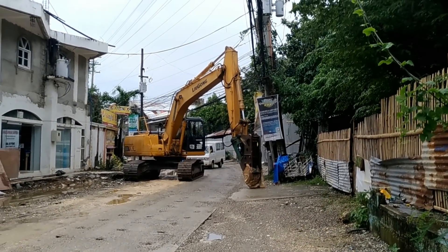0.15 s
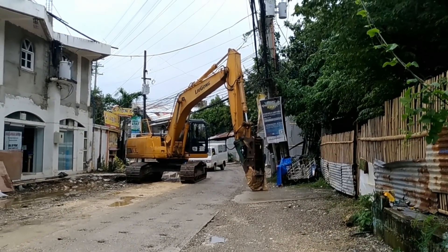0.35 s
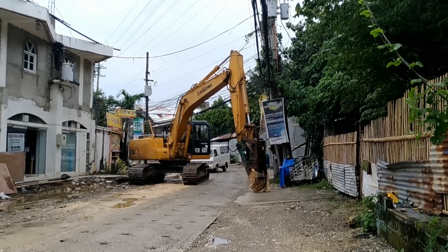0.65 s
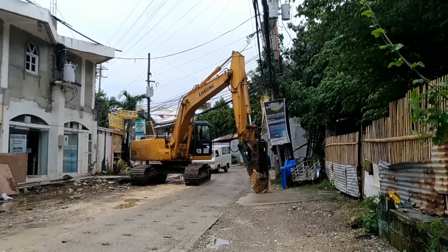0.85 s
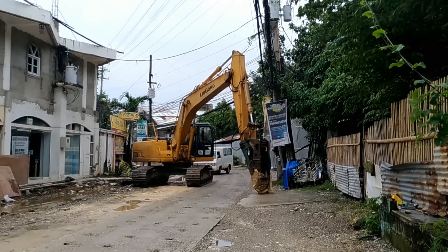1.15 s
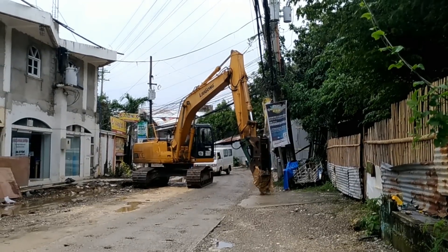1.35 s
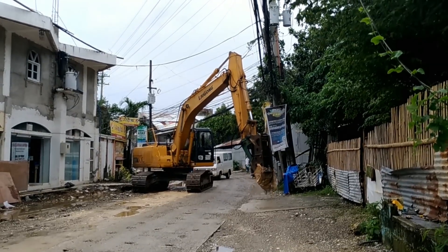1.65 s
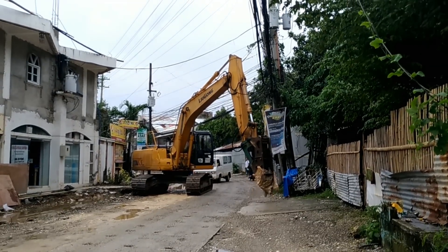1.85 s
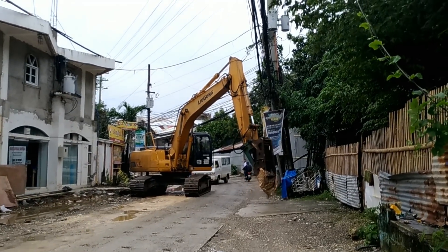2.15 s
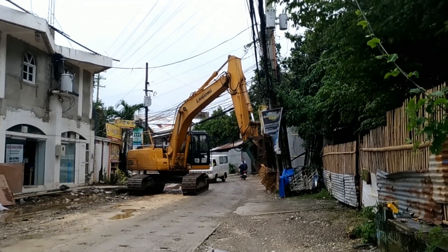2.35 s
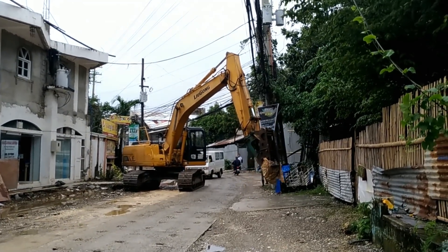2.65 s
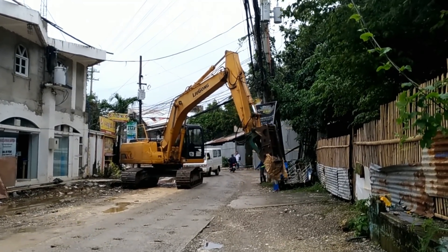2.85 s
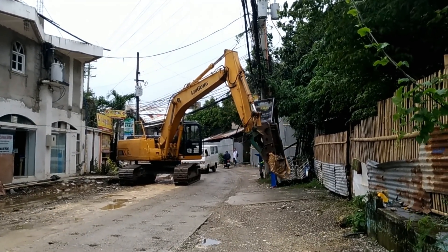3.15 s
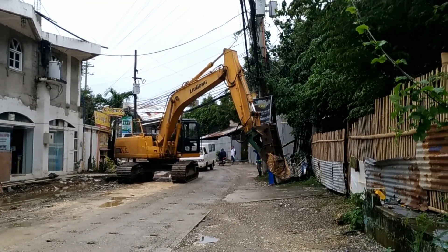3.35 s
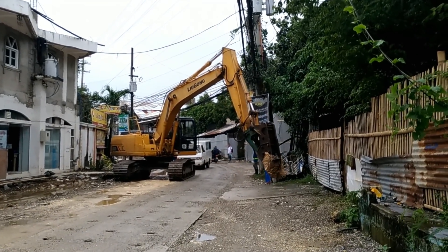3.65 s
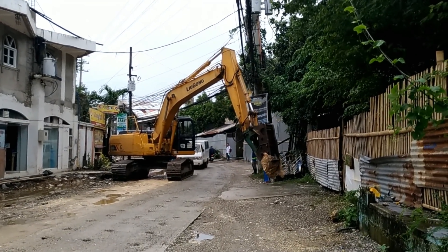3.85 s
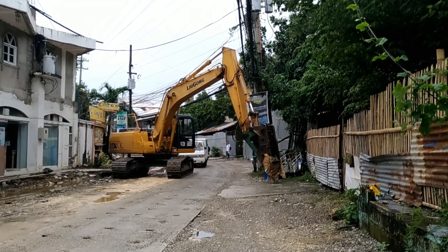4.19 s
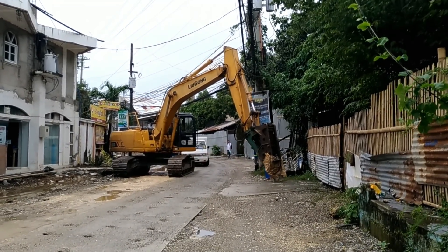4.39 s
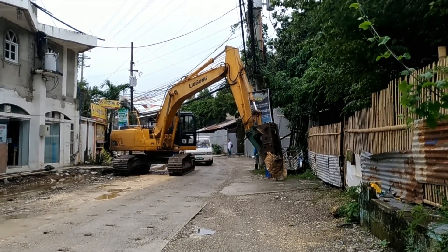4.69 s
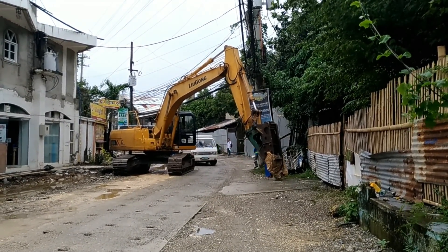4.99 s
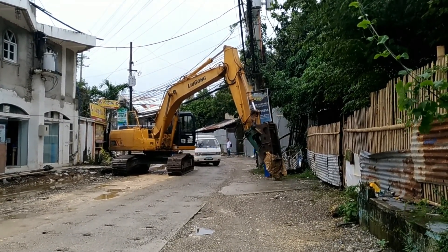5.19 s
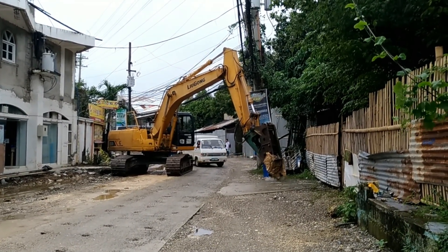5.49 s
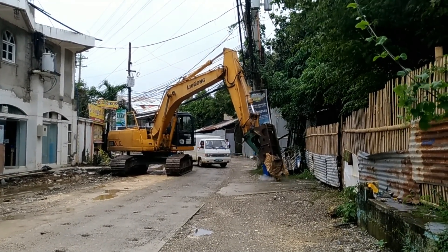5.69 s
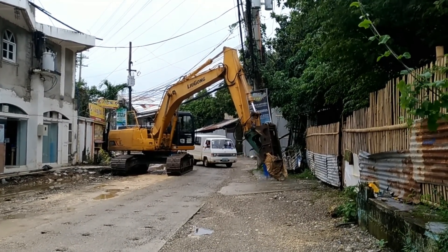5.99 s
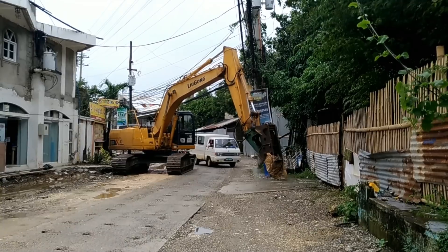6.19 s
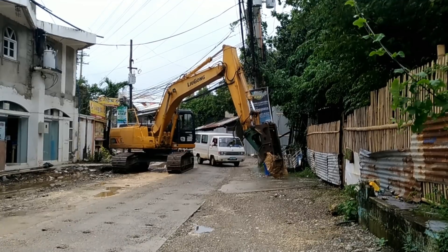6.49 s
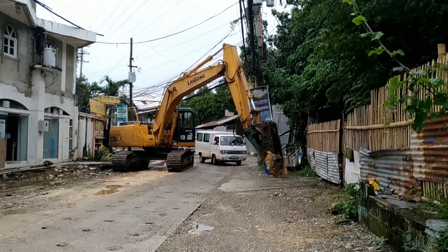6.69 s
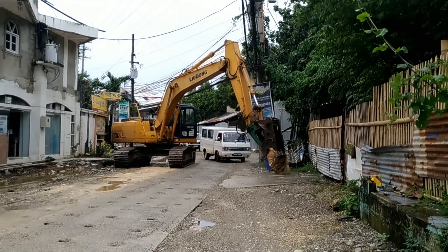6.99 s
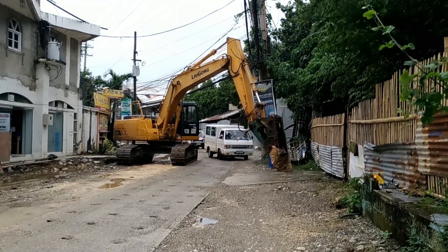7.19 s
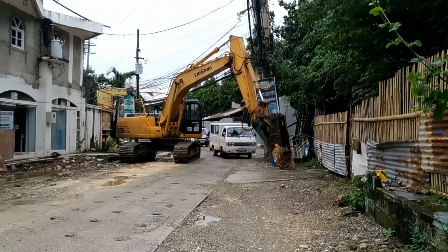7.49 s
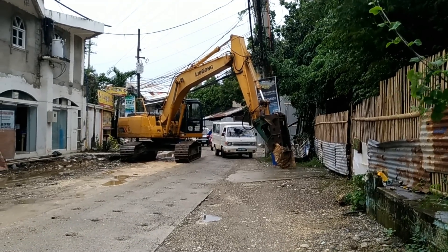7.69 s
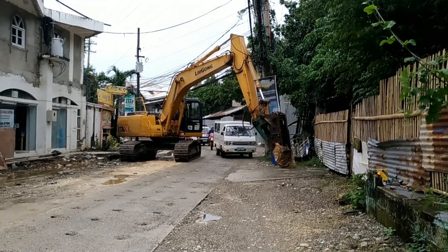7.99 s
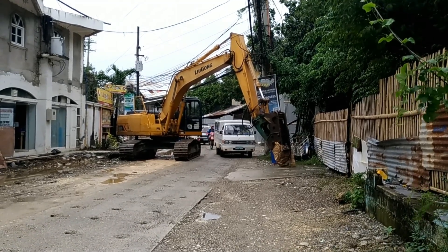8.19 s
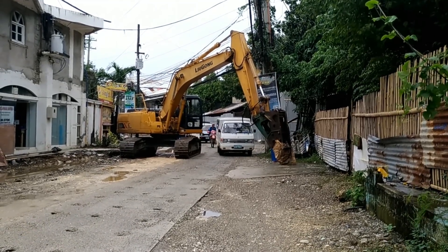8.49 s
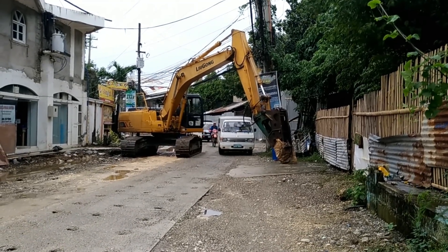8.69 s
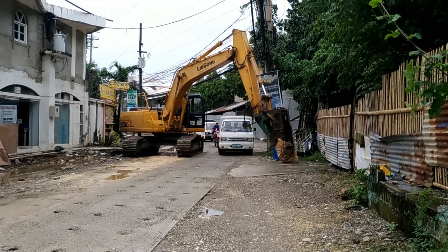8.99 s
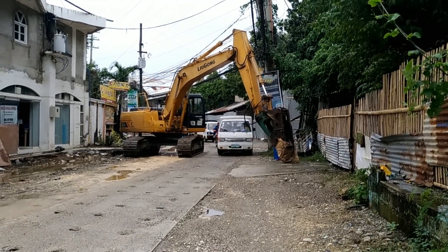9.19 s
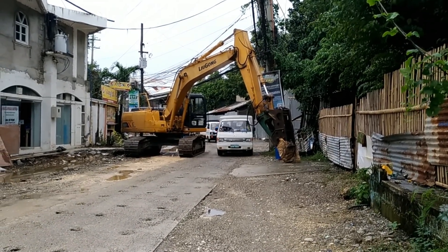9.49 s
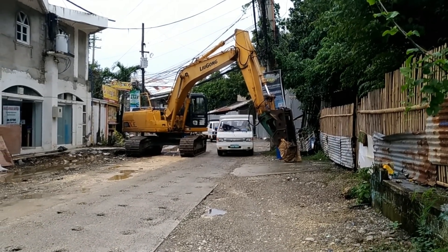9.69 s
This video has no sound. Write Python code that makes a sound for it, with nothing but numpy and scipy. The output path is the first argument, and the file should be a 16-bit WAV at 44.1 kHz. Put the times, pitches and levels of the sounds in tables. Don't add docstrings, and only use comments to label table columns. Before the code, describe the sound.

An excavator's hydraulic breaker hammers concrete, pauses over a steady diesel hum with loose steel clanks, then resumes rapid, hard, echoing blows to the end.

```python
import sys
import numpy as np
from scipy import signal
from scipy.io import wavfile
from scipy.ndimage import uniform_filter1d

SR = 44100
rng = np.random.default_rng(int(sys.argv[2]) if len(sys.argv) > 2 else 0)


def rack_gain(trim_db):
    fader = np.asarray(trim_db, float)
    return 10 ** (fader / 20)


def pcm_store(signal):
    levels = np.round(np.clip(np.atleast_2d(signal), -1, 1) * 32767)
    wavfile.write(sys.argv[1], SR, levels.astype(np.int16).T)


N = 434385
TIME = np.arange(N) / SR
EDGES_HZ = 22 * 2 ** np.arange(0, 9.6, 1 / 3)

# [t/s, firing rate f/Hz, exhaust note level/dB]
DIESEL = [(0, 77.3, -34), (1.2, 76, -31.5), (1.55, 76.8, -30.5), (1.8, 79, -28.5), (2.1, 79, -30),
          (2.4, 77.8, -31.5), (3.0, 78, -36), (3.5, 81, -28), (4.0, 80.6, -29.5), (4.3, 78, -27),
          (4.6, 78.6, -29), (4.9, 80.3, -29.5), (5.15, 80, -30.5), (5.9, 77.3, -31.5), (9.85, 77.1, -29.5)]
# [multiple of firing rate, level/dB]
ENGINE_ORDERS = [(1.5, -10), (2, -5.5), (2.5, -9), (3, -3), (3.5, -21.5), (4, -17), (5, -23.5)]
# [t/s, f/Hz, level/dB]
HIGH_WHINE = [
    (1.3, 196, -30.5),
    (1.9, 199, -52),
    (2.4, 201, -50),
    (3.0, 199, -36.5),
    (3.65, 207.5, -29.5),
    (4.1, 204.4, -36),
    (4.5, 201.8, -38),
    (4.95, 203.6, -31),
    (5.15, 199, -41),
]
# [f/Hz, level/dB per Hz]
RUMBLE_COLOUR = [(12, -75), (20, -43), (48, -12), (57, -10.5), (75, -2.5), (176, -1.5), (241, -17.5),
                 (267, 10), (307, -15), (600, -23), (780, -54), (1320, -120)]
# [f/Hz, level/dB per Hz]
ROAR_COLOUR = [(180, -40), (300, -4), (450, -22), (726, -2.5), (1020, -10), (1190, -5), (1570, -16),
               (2100, -8), (2730, -16.5), (3490, -13.5), (6000, -17), (8300, -22), (11000, -19.5),
               (12200, -39), (15500, -74)]
# [f/Hz, likeness from -1 to 1]
ENGINE_LIKENESS = [(30, 0.7), (60, 0.93), (180, 1), (540, 0.76), (1620, -0.041), (4840, -0.11),
                   (14500, 0.79)]
# [f/Hz, left minus right level/dB]
ENGINE_PAN = [(60, 1), (200, 0.5), (600, 1.2), (1500, -0.3), (3000, -4), (6000, -6), (9000, -17),
              (12000, 34)]
# [t/s, f/Hz]
TURBO = [
    (1.2, 11500),
    (1.3, 11870),
    (1.58, 12400),
    (2.41, 11300),
    (2.95, 11620),
    (3.4, 11080),
    (4.15, 10280),
    (5.15, 9980),
]
# [t/s, f/Hz, level/dB]
SQUEAK = [
    (4.91, 10300, -58),
    (4.93, 10970, -32),
    (4.96, 11010, -48),
    (5.0, 11100, -62),
]
# [t/s, level/dB, f/Hz]
BOOM_KNOCKS = [
    (0.998, -22, 450),
    (1.163, -20.5, 185),
    (1.788, -27.5, 172),
    (5.171, -18, 324),
    (5.171, -22, 560),
    (4.05, -29, 322),
    (4.301, -31, 336),
    (4.578, -30, 600),
    (4.66, -30, 760),
]
# [t/s, length/s, level/dB]
RATTLE = [
    (-0.1, 0.89, -13.5),
    (0.96, 0.38, -28.5),
    (5.159, 0.12, -18),
    (5.323, 0.2, -14.5),
    (5.55, 0.31, -20.5),
    (6.4, 3.73, -27.5),
]
# [f/Hz, level/dB per Hz]
RATTLE_COLOUR = [(120, -27), (200, -18), (300, -4), (590, -3.5), (1680, -6.5), (2400, -5), (4630, -10.5),
                 (7500, -12.5), (11000, -30.5), (15500, -42)]
# [f/Hz, level/dB, time to fall 60 dB/s]
TOOL_MODES = [(449, 11, 0.18), (800, -6, 0.12), (893, -3.5, 0.15), (1150, -7, 0.25), (1463, -1, 0.43),
              (1610, -1.5, 0.19), (2303, -5.5, 0.57), (2350, -8.5, 0.5), (2510, -2.5, 0.23),
              (2573, -8.5, 0.4), (2760, 1, 0.19), (2960, -18, 0.21), (4170, -6.5, 0.24),
              (4800, -14.5, 0.28), (6590, 0, 0.12), (2950, -9, 0.16)]
# [t/s, peak level/dB, favoured ring f/Hz]
CLANKS = [(0.249, -13, 2450), (0.19, -14, 2760), (0.299, -9, 1610), (0.319, -14, 2280), (0.649, -6, 4170),
          (0.955, -5, 1000), (1.165, -11, 6590), (1.165, -16, 900), (1.23, -14, 1560), (1.25, -23, 2573),
          (1.4, -19, 4800), (1.455, -16, 4800), (1.613, -18, 1900), (1.723, -15, 940), (1.725, -30, 1610),
          (1.73, -25, 2280), (1.8, -30, 2280), (1.8, -14, 800), (2.079, -19, 790), (5.17, -11.5, 2780),
          (5.21, -7, 2770), (5.385, -12, 4170), (5.39, -13, 2780), (5.489, -8, 2280), (5.585, -9, 4170),
          (5.79, -17, 6590), (5.81, -5, 4800), (5.94, 2, 790)]
# [t/s, peak level/dB]
PISTON_BLOWS = [
    (0.031, -11),
    (0.191, -10),
    (0.353, -8.5),
    (0.514, -8.5),
    (0.703, -13),
    (0.951, -7.5),
    (1.161, -11),
                (5.165, -9.5), (5.386, -11), (5.581, -8.5), (5.76, -8.5), (5.934, -4), (6.108, -4),
               (6.278, -4), (6.446, -4.5), (6.617, -5.5), (6.795, -6), (6.978, -5.5), (7.154, -5.5),
               (7.327, -5), (7.501, -4), (7.677, -4), (7.855, -4), (8.036, -4.5), (8.217, -4),
               (8.403, -5.5), (8.592, -5.5), (8.782, -5), (8.973, -5.5), (9.164, -5.5), (9.35, -5),
               (9.537, -6), (9.728, -4.5)]
# [t/s, wash over crack level/dB, brightness level/dB per octave, note of the slab f/Hz]
SEATING = [(0.03, 2.5, 1.3, 800), (0.5, 1, 0.7, 800), (0.95, -2.5, -0.96, 900), (1.16, -4.5, 0.7, 905),
           (5.165, 0, -0.9, 900), (5.76, 1, -0.7, 710), (5.93, -2.5, 0, 760), (6.4, -2, 0.96, 990),
           (7.0, -1.06, 0.64, 1070), (7.7, -2.5, 0.5, 1450), (8.2, -2.5, 1.05, 1480), (8.8, -4, 0, 523),
           (9.35, -3.5, 0.1, 500), (9.73, -2, 0.1, 700)]
# [f/Hz, level/dB per Hz]
CRACK_COLOUR = [(120, -33), (200, -7.5), (500, -7), (790, 1.5), (1050, -7), (1330, 1), (2130, -2),
                (3300, -4.5), (4080, -10.5), (5070, -12), (8000, -10.5), (11000, -20), (15500, -35.5)]
# [f/Hz, left minus right level/dB]
CRACK_PAN = [(300, 2.5), (1400, 2.5), (2800, -2.5), (6000, -1), (11000, 1.5)]
# [f/Hz, time to fall 60 dB/s]
CRACK_T60 = [(300, 0.15), (800, 0.27), (1500, 0.23), (3000, 0.15), (6000, 0.21), (12000, 0.1)]
# [f/Hz, level/dB per Hz]
WASH_COLOUR = [(120, -10), (200, -7.5), (490, -4.5), (775, 2.5), (1020, 0), (1280, -0.5), (1620, -4),
               (3170, 0), (4010, -6), (6000, -6.5), (8100, -10.5), (11000, -19), (15500, -56)]
# [f/Hz, left minus right level/dB]
WASH_PAN = [(300, -0.5), (1400, 1.5), (2800, -4), (6000, -5), (9000, -10.5), (12500, 24)]
# [f/Hz, time to fall 60 dB/s]
WASH_T60 = [(300, 1.17), (800, 0.52), (1500, 0.51), (3000, 0.46), (6000, 0.51), (12000, 0.93)]
# [f/Hz, likeness from -1 to 1]
WASH_LIKENESS = [(300, 1), (700, 0.62), (1400, 0.04), (2800, 0.09), (6000, 0.025)]
# [f/Hz, share of moments missing]
DROPOUTS = [(4200, .01), (5500, .1), (7500, .22), (8600, .2), (9300, .5), (11000, .5), (14000, .7)]


def in_time(rows, silent=None):
    s, *columns, last = np.transpose(rows)
    return [np.interp(TIME, s, c) for c in columns] + [np.interp(TIME, s, last, silent, silent)]


def at_hz(points, hz):
    table = np.array(points)
    return np.interp(np.log(hz), np.log(table[:, 0]), table[:, 1])


def rms_one(x):
    return x / np.sqrt(np.mean(x ** 2) + 1e-20)


def slow_chance(rate):
    r = np.exp(-80 * np.pi * rate / SR)
    wander = signal.lfilter([1], [1, -2 * r, r * r], rng.standard_normal(N // 40 + 2002))
    return rms_one(wander[2000:])


def full_rate(slow):
    return np.interp(np.arange(N) / 40, np.arange(len(slow)), slow)


def drift(rate):
    return full_rate(slow_chance(rate))


def clicks(seconds, gains):
    out = np.full(N, 1e-18)
    places = np.round(np.asarray(seconds) * SR).astype(int)
    np.add.at(out, np.minimum(places, N - 1), gains)
    return out


def dying(x, t60):
    power = signal.lfilter([1], [1, -rack_gain(-120 / (t60 * SR))], x ** 2 + 1e-18)
    return np.sqrt(power)


def ring(x, hz, t60):
    r, w = rack_gain(-60 / (t60 * SR)), 2 * np.pi * hz / SR
    return signal.lfilter([0, np.sin(w)], [1, -2 * r * np.cos(w), r * r], x)


def bank(feed, spectrum, pan):
    out = np.zeros((2, N))
    for k, (low, high) in enumerate(zip(EDGES_HZ, EDGES_HZ[1:])):
        hz = np.sqrt(low * high)
        if spectrum[0][0] < hz < spectrum[-1][0]:
            gain = rack_gain(at_hz(spectrum, hz) + at_hz(pan, hz) * np.array([[.5], [-.5]]))
            band = signal.butter(2, [low, high], "band", fs=SR, output="sos")
            out += gain * signal.sosfilt(band, feed(k, hz))
    return out


def pair(white, alike):
    alike = np.clip(alike, -1, 1)
    middle, side = np.sqrt(1 + alike) * white[0], np.sqrt(1 - alike) * white[1]
    return middle + side * [[1], [-1]]


def steady(spectrum, pan, likeness, patchy_db, grain=1):
    white = rng.standard_normal((2, 2, N)) * grain
    together = slow_chance(2.6)

    def flickering(k, hz):
        flicker = full_rate(rack_gain(patchy_db * (.4 * together + slow_chance(12))))
        return pair(white[k % 2], at_hz(likeness, hz)) * flicker

    return rms_one(bank(flickering, spectrum, pan))


def wavering(hz, db, spread_hz, rate, flutter_db):
    flutter = full_rate(rack_gain(flutter_db * slow_chance(rate)))
    phase = 2 * np.pi * np.cumsum(hz + spread_hz * drift(rate)) / SR
    return np.sqrt(2) * rack_gain(db) * flutter * np.sin(phase)


def engine_tones(firing_hz, note_db):
    tones = wavering(firing_hz, note_db, spread_hz=.25, rate=6, flutter_db=1.1)
    for multiple, db in ENGINE_ORDERS:
        tones = tones + wavering(multiple * firing_hz, note_db + db, spread_hz=.3, rate=3, flutter_db=1.5)
    return tones


def engine_rumble():
    pausing = (TIME > 1.1) & (TIME < 5.0)
    rumble_db = uniform_filter1d(np.where(pausing, -27.5, -26), size=SR // 4)
    return rack_gain(rumble_db) * steady(RUMBLE_COLOUR, ENGINE_PAN, ENGINE_LIKENESS, patchy_db=0.26)


def fan_roar(firing_hz):
    floor_db, start_db, fall_db_per_s = -36, -21.5, 6
    swell_s, swell_width_s, swell_db = 2.75, 0.34, 3
    roar_db = np.maximum(floor_db, start_db - fall_db_per_s * TIME)
    roar_db = roar_db + swell_db * np.exp(-((TIME - swell_s) / swell_width_s) ** 2)
    throb = 1 + 0.086 * np.sin(2 * np.pi * np.cumsum(firing_hz) / SR)
    return rack_gain(roar_db) * throb * steady(ROAR_COLOUR, ENGINE_PAN, ENGINE_LIKENESS, patchy_db=1.4)


def cooler_whine():
    breath = rms_one(ring(rng.standard_normal((2, N)), hz=2780, t60=0.0072))
    return rack_gain(-45) * breath * rack_gain(np.array([[-2], [2]]))


def diesel():
    firing_hz, note_db = in_time(DIESEL)
    high_whine = wavering(*in_time(HIGH_WHINE, silent=-35.5), spread_hz=1.4, rate=2.69, flutter_db=2.0)
    tones = engine_tones(firing_hz, note_db) + high_whine
    return tones + engine_rumble() + fan_roar(firing_hz) + cooler_whine()


def turbocharger():
    hz, = in_time(TURBO)
    db = -70.5 - 11 * np.log2(hz / 11000)
    return np.array([wavering(hz, db + side_db, spread_hz=89, rate=380, flutter_db=5.0)
                     for side_db in (22, 15)])


def brake_squeak():
    return wavering(*in_time(SQUEAK, silent=-120), spread_hz=59, rate=90, flutter_db=3.0)


def boom():
    white = rng.standard_normal(N)
    knocks = np.zeros(N)
    for s, db, hz in BOOM_KNOCKS:
        thump = white * dying(clicks([s], rack_gain(db - 16.5)), 0.15)
        knocks += ring(thump, hz, 17.4 / hz)
    return knocks


def blows():
    usual_gap_s, longest_gap_s = 0.175, 0.195
    s, peak_db = np.transpose(PISTON_BLOWS)
    gap_s = np.diff(s, prepend=s[0] - usual_gap_s)
    slower_s = np.minimum(gap_s, longest_gap_s) - usual_gap_s
    thud_db = 2 + 128 * slower_s
    when, *seating = np.transpose(SEATING)
    slack_db, bright_db, slab_hz = (np.interp(s, when, column) for column in seating)
    return s, peak_db, slack_db, thud_db, bright_db, slab_hz


def rattling():
    rise_db, rise_db_per_s, fall_db_per_s = 5.5, 120, 87
    spells = []
    for s, length, db in RATTLE:
        still_to_rise = np.maximum(rise_db - rise_db_per_s * (TIME - s), 0)
        fallen = fall_db_per_s * np.maximum(TIME - s - length, 0)
        spells.append(np.where(TIME > s, db, -200) - still_to_rise - fallen)
    return rack_gain(np.max(spells, axis=0))


def clanks():
    s, _, slack_db, *_ = blows()
    housing = []
    for t in s[slack_db > -1.5]:
        housing += [(t + 0.002, 0.1, 810), (t + 0.066, -8, 810)]
    chatter = [(1.229 + touch * 0.048, -17.5, 2280) for touch in range(5)]
    return CLANKS + housing + chatter


def tool():
    level = rattling()
    grain = rack_gain(2.6 * np.minimum(rng.exponential(1, N), 4) + 1.7 * drift(41))
    knocked = np.flatnonzero(rng.random(N) < 80 / SR)
    s, db, clank_hz = np.transpose(clanks())
    knock_hz = 1400 * 2 ** rng.uniform(0, 2.39, len(knocked))
    struck_hz = np.append(clank_hz, knock_hz)
    moments = np.append(s, knocked / SR)
    strengths = np.append(rack_gain(db - 7.0), rack_gain(-8.0) * level[knocked])
    uneven_db = rng.standard_normal((len(moments), len(TOOL_MODES)))
    sides_db = rng.standard_normal((len(TOOL_MODES), 2, 1))
    rings = np.zeros((2, N))
    for k, (hz, mode_db, t60) in enumerate(TOOL_MODES):
        off_pitch_db = 41 * np.abs(np.log2(hz / struck_hz))
        hits = clicks(moments, strengths * rack_gain(1.4 * uneven_db[:, k] - off_pitch_db))
        rings += rack_gain(mode_db + 3.3 * sides_db[k]) * ring(hits, hz, t60)
    return rings + level * steady(RATTLE_COLOUR, WASH_PAN, WASH_LIKENESS, patchy_db=0.5, grain=grain)


def breaker():
    wall_delay_s, far_wall_delay_s, right_lag_s = 0.025, 0.0393, 0.000284
    s, peak_db, slack_db, thud_db, bright_db, slab_hz = blows()
    starts = np.round(s * SR).astype(int)
    latest = np.maximum(np.searchsorted(starts, np.arange(N), "right") - 1, 0)
    since = np.abs(np.arange(N) - starts[latest])
    repeating, fresh = rng.standard_normal((2, 2, 2, N))
    grit = rack_gain(0.65 * drift(330))
    white = (0.92 * repeating[..., since] + 0.49 * fresh) * grit
    spread_db = rng.standard_normal((len(s), len(EDGES_HZ)))

    def strength(k, hz):
        slab_db = 1 * np.exp(-(np.log2(hz / slab_hz) / 0.41) ** 2)
        tilt_db = bright_db * np.log2(hz / 2500) + thud_db * (hz < 600)
        return rack_gain(peak_db + slab_db + tilt_db + 1.3 * spread_db[:, k])

    def direct(k, hz):
        struck = clicks(s, strength(k, hz))
        tick = 0.13 * dying(struck, 0.056)
        left, right = pair(white[k % 2], 0.74) * (dying(struck, at_hz(CRACK_T60, hz)) + tick)
        lag = round(right_lag_s * SR) * (hz > 1400)
        return np.array([left, np.roll(right, lag)])

    def wash(k, hz):
        near = np.clip(np.log2(hz / 900) / 2.24, .2, 1)
        far = np.sqrt(1 - near ** 2)
        gains = strength(k, hz) * rack_gain(slack_db)
        echoes = clicks(s + wall_delay_s, gains * near) + clicks(s + far_wall_delay_s, gains * far)
        swell = uniform_filter1d(dying(echoes, at_hz(WASH_T60, hz)), size=151, origin=75)
        return pair(white[1 - k % 2], at_hz(WASH_LIKENESS, hz)) * swell

    crack = rack_gain(5.0) * bank(direct, CRACK_COLOUR, CRACK_PAN)
    echo = rack_gain(2.5) * bank(wash, WASH_COLOUR, WASH_PAN)
    push = ring(ring(clicks(s, rack_gain(peak_db + thud_db)), 274.0, 0.061), 255.0, 0.0096)
    return crack + echo + rack_gain(-39) * push


def scene():
    return diesel() + turbocharger() + brake_squeak() + boom() + tool() + breaker()


def kept_bands(hz, frames):
    lows = np.arange(0, len(hz), 12)
    band_hz = hz[::12]
    own = rng.standard_normal((3, len(lows), frames.shape[-1]))
    own = .6 * own[:2] + .8 * own[2]
    lower = np.clip((9500 - band_hz[:, None]) / 500, 0, 1)
    shared = uniform_filter1d(own, size=3, axis=1) * lower
    chance = uniform_filter1d(0.65 * own + 1.4 * shared, size=2, axis=2)
    level_db = 10 * np.log10(np.add.reduceat(np.abs(frames) ** 2, lows, axis=1) + 1e-14)
    around_db = uniform_filter1d(uniform_filter1d(level_db, size=7, axis=1), size=13, axis=2)
    chance = chance + .07 * (level_db - around_db)
    share = np.clip(at_hz(DROPOUTS, band_hz + 150), 0, 1) * (band_hz > 4000)
    rank = np.argsort(np.argsort(chance))
    return rank >= share[:, None] * frames.shape[-1]


def roll_off(x):
    return signal.sosfilt(signal.butter(12, 15120, fs=SR, output="sos"), x)


def record(dry):
    rounded = 0.95 * np.tanh(dry / 1.156)
    hz, _, frames = signal.stft(rounded, SR, nperseg=1536)
    shelf_db = -6.5 * np.clip((hz - 8410) / 500, 0, 1) - 30 * np.clip((hz - 14270) / 200, 0, 1)
    kept = kept_bands(hz, frames)[:, np.arange(len(hz)) // 12]
    frames = frames * rack_gain(shelf_db)[:, None] * np.maximum(kept, .04)
    mix = signal.istft(frames, SR, nperseg=1536)[1][:, :N]
    return roll_off(mix)


dry = scene()
out = record(dry)
pcm_store(out)
```